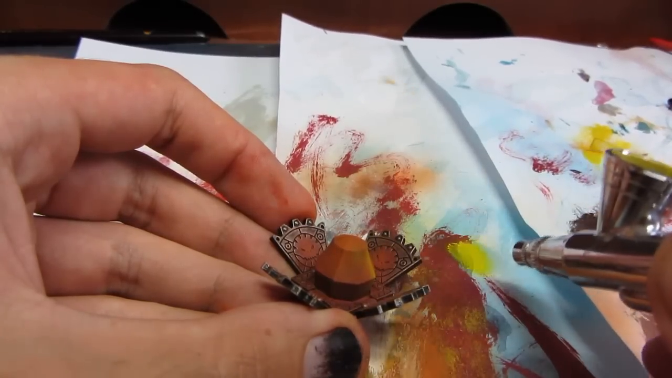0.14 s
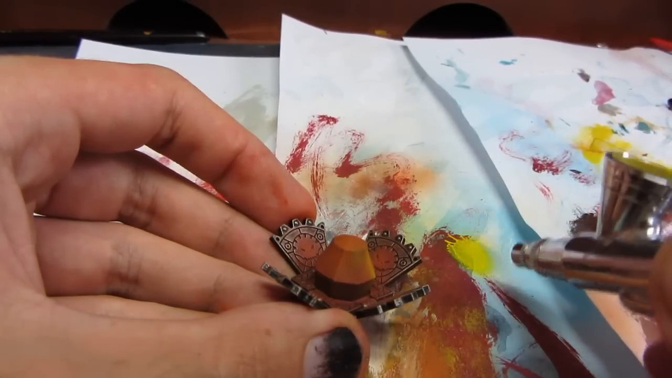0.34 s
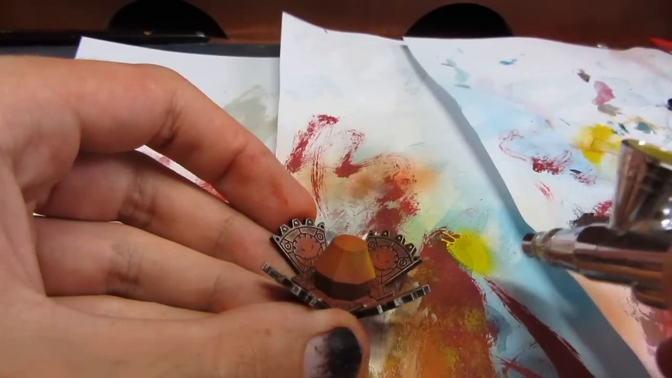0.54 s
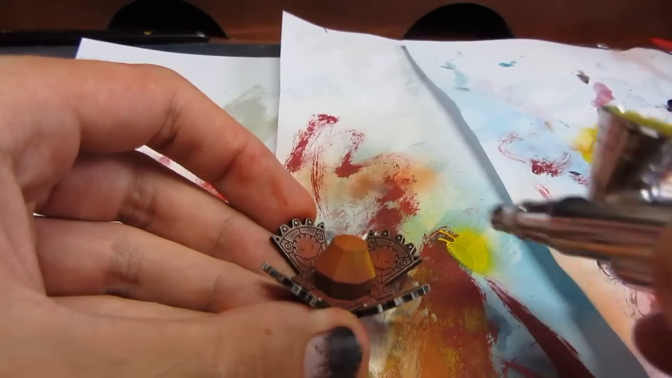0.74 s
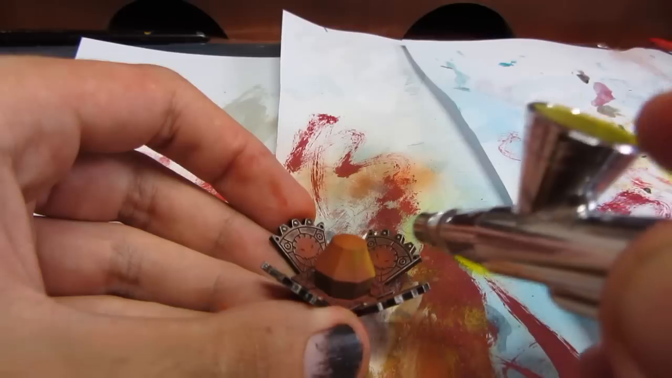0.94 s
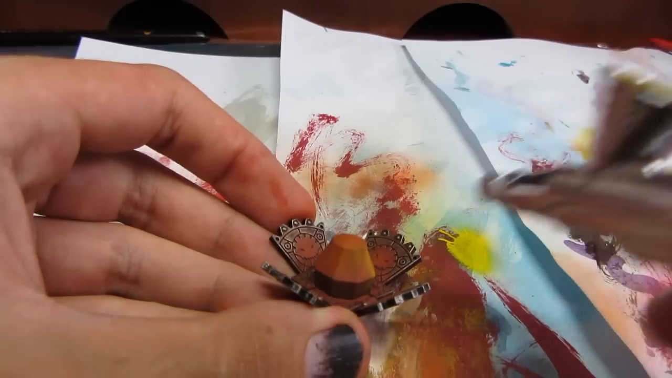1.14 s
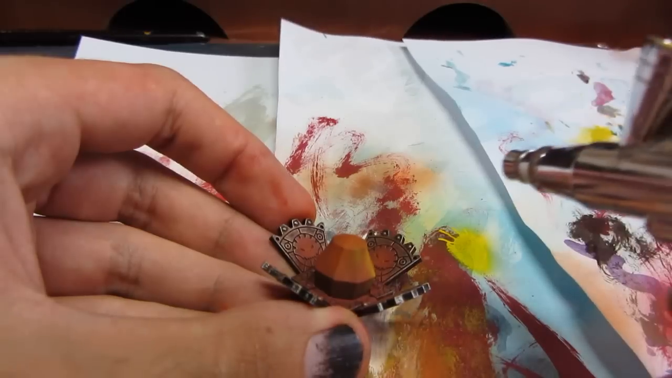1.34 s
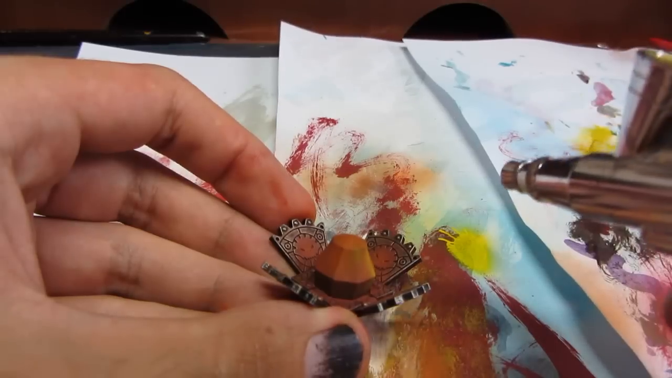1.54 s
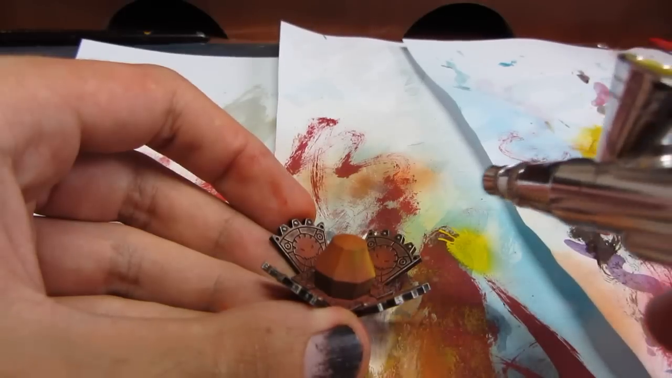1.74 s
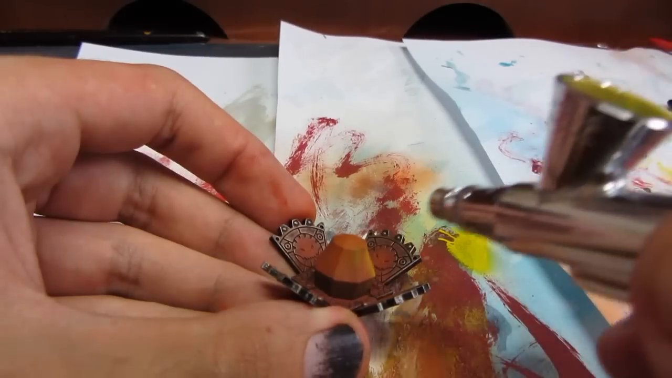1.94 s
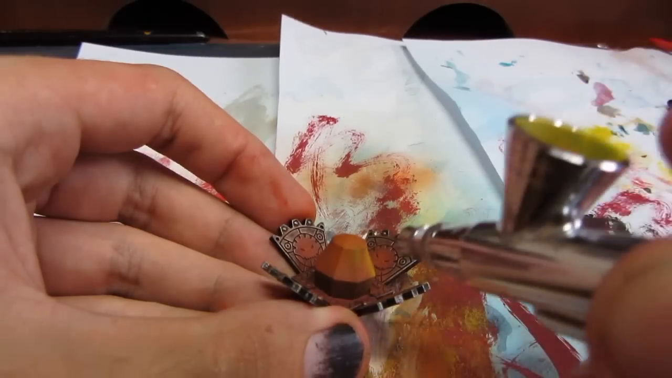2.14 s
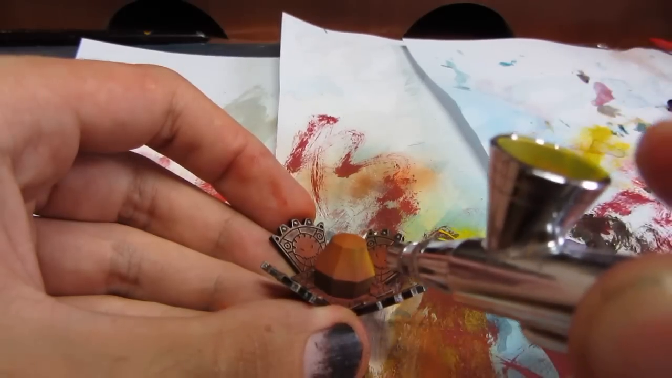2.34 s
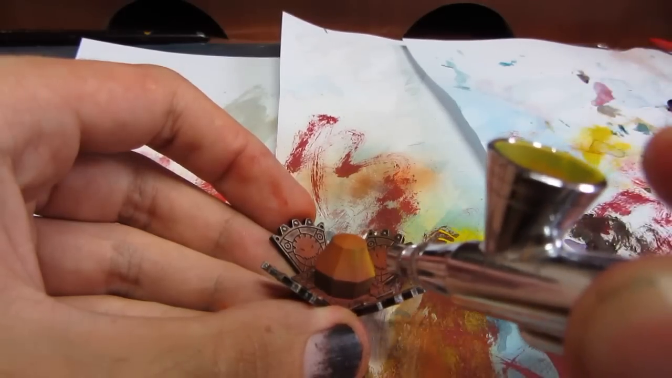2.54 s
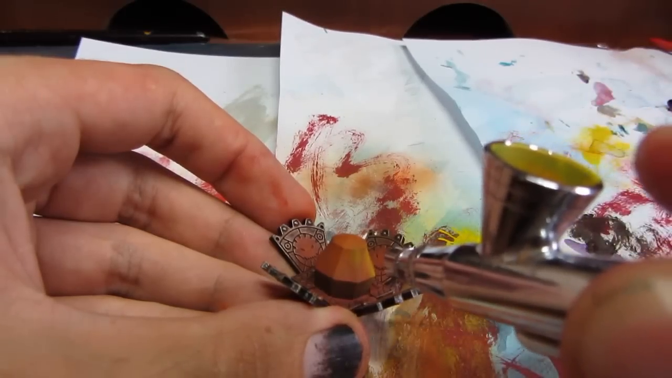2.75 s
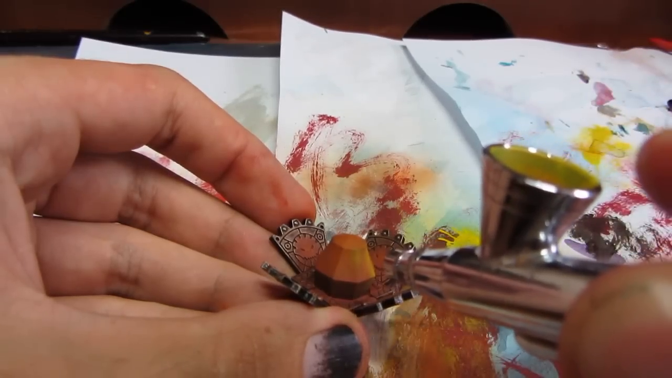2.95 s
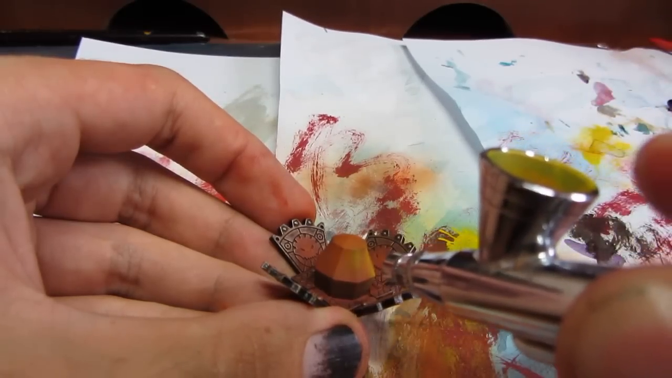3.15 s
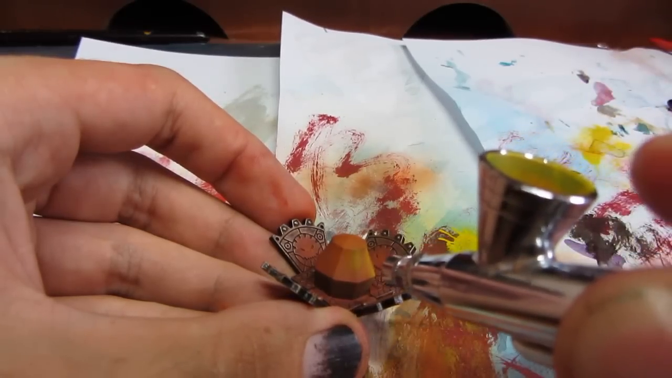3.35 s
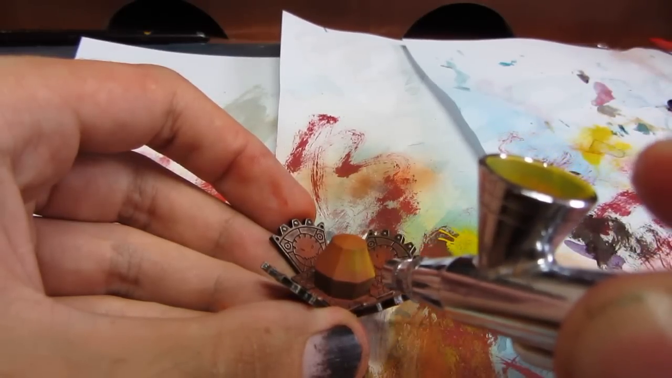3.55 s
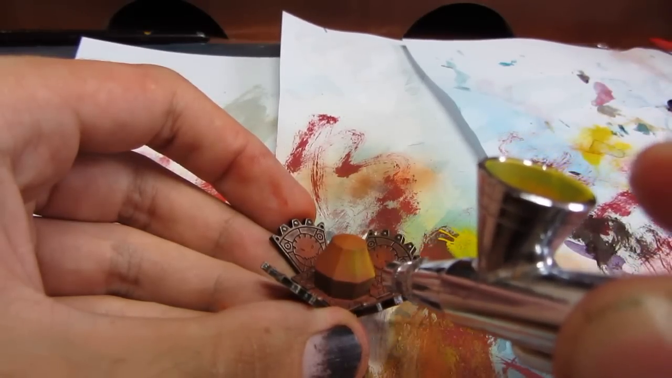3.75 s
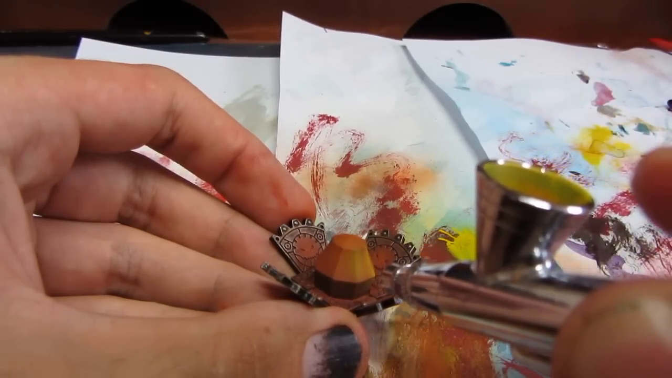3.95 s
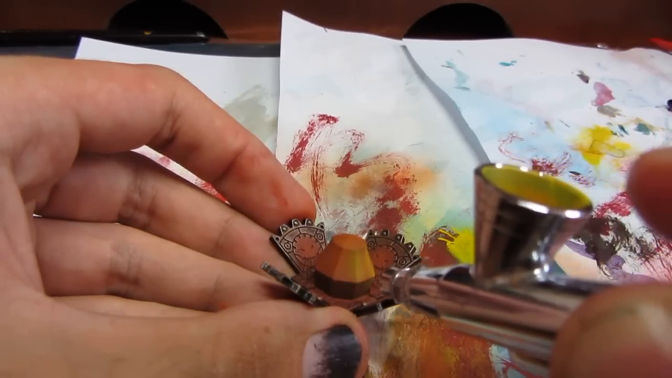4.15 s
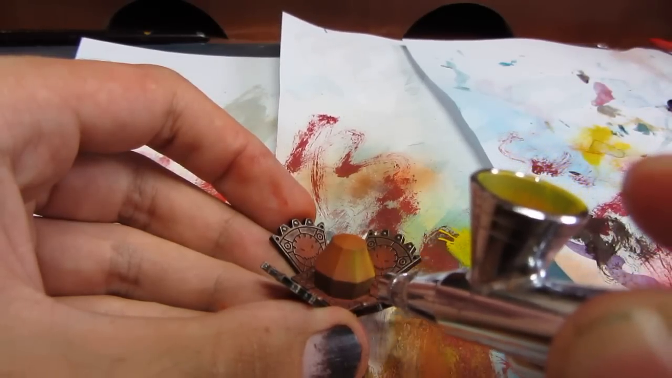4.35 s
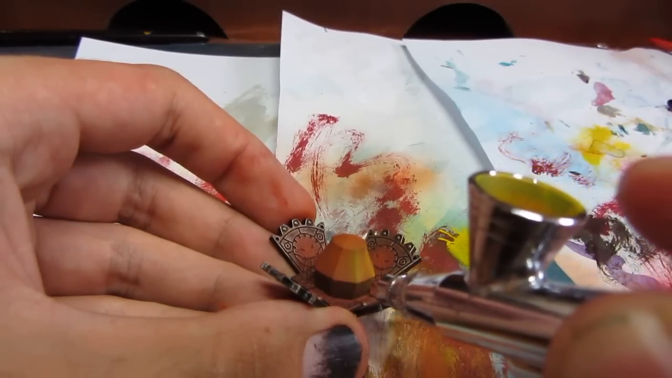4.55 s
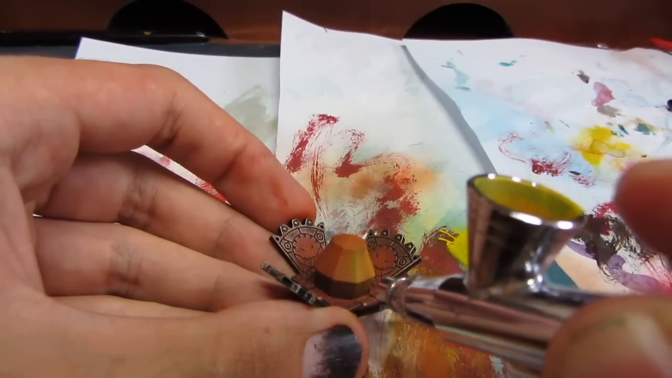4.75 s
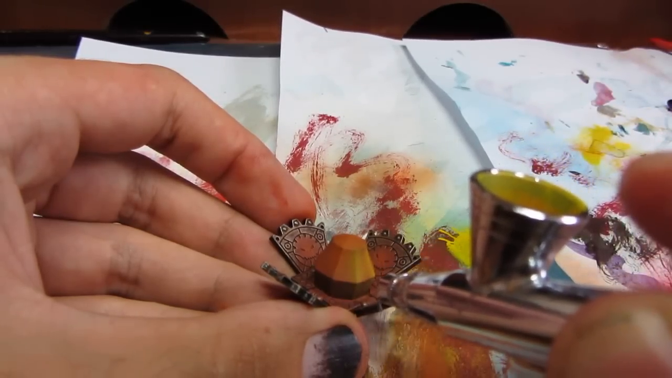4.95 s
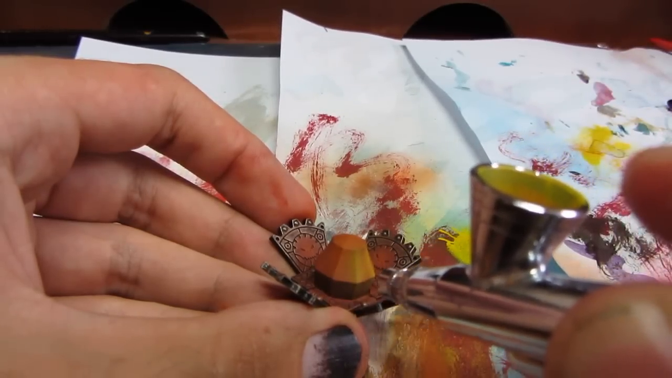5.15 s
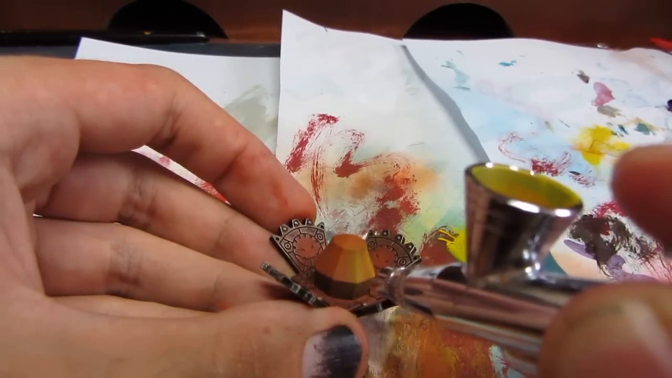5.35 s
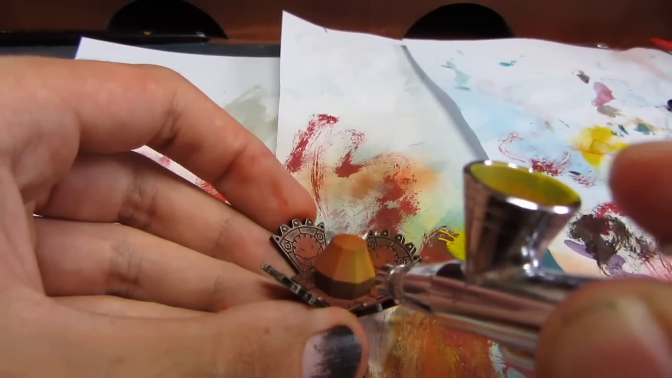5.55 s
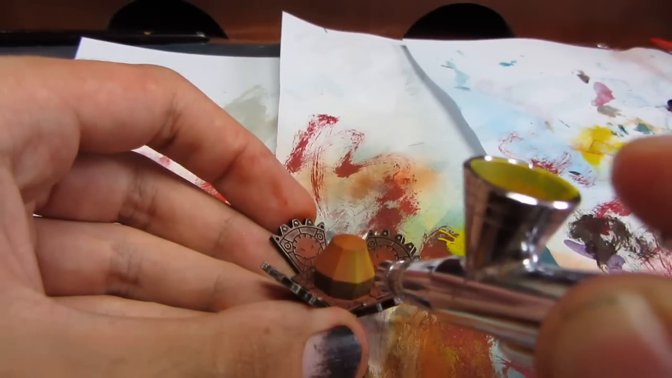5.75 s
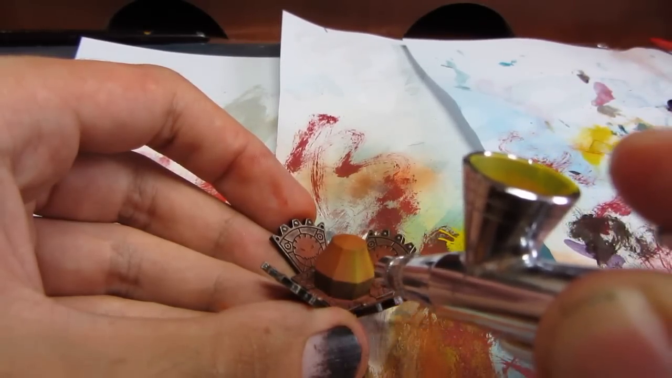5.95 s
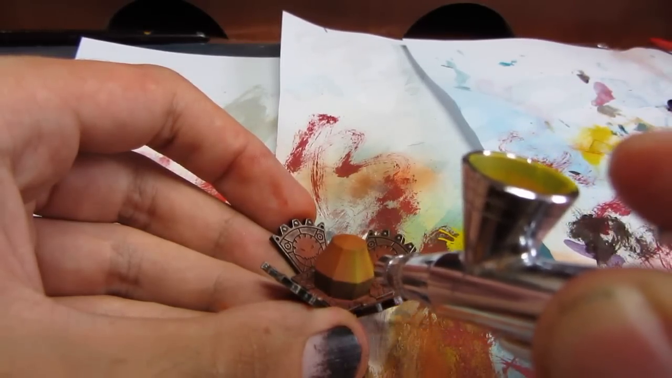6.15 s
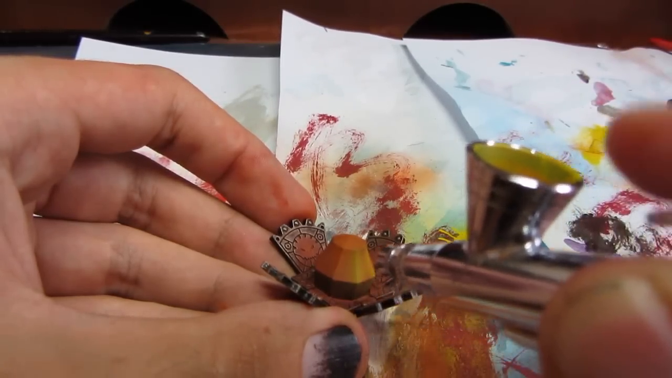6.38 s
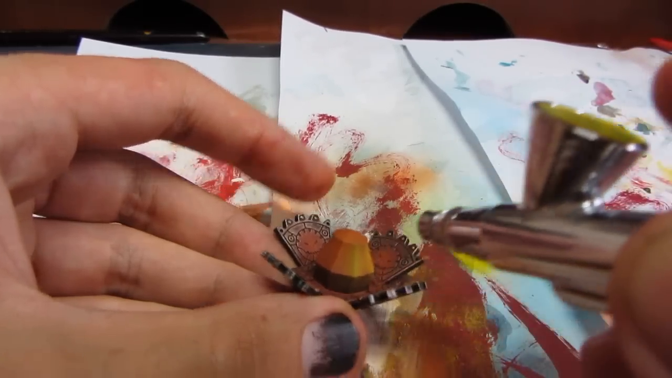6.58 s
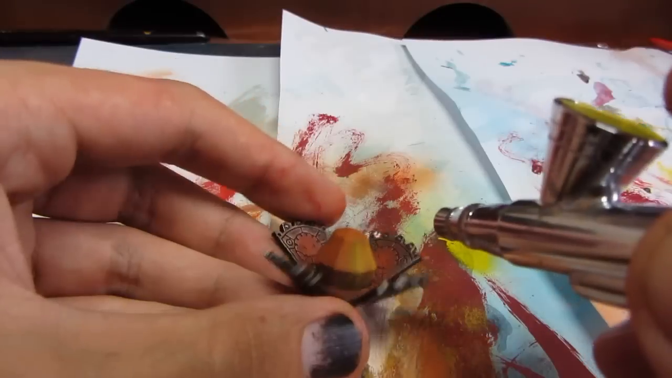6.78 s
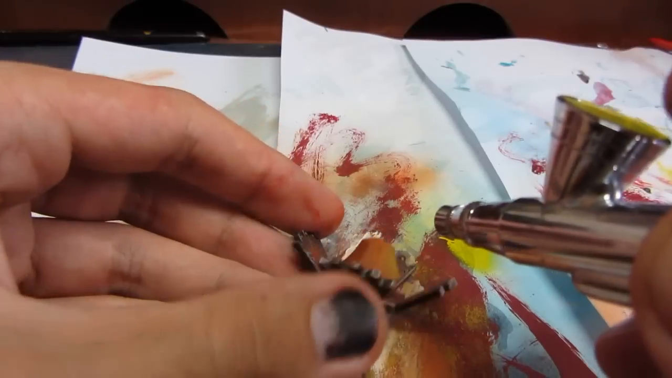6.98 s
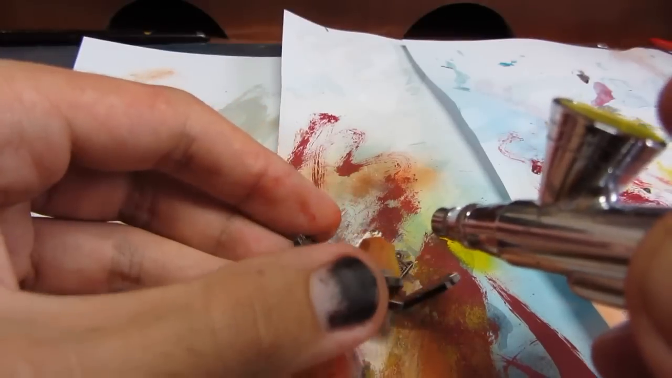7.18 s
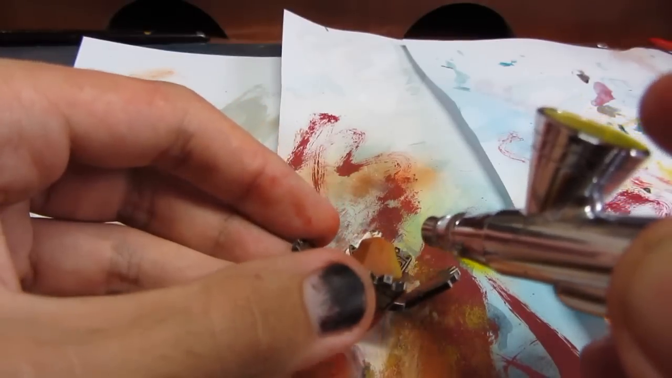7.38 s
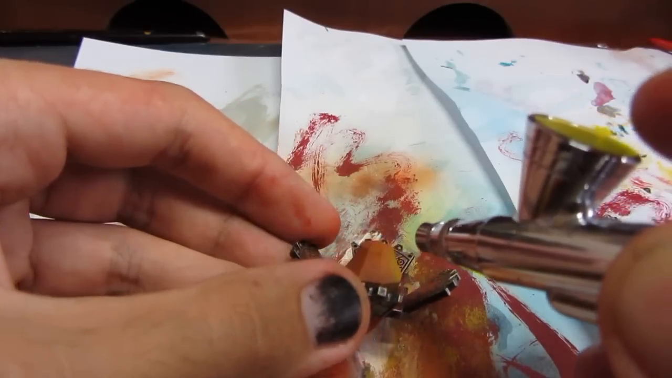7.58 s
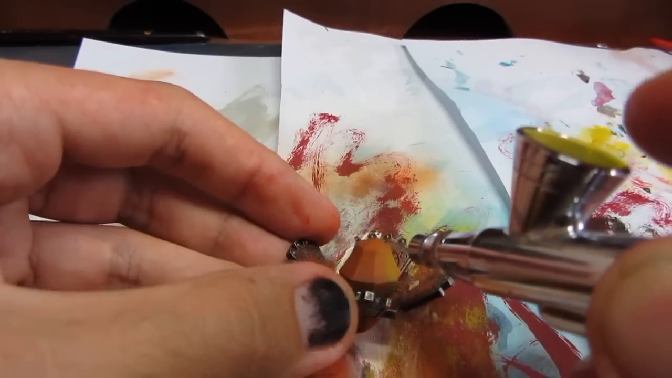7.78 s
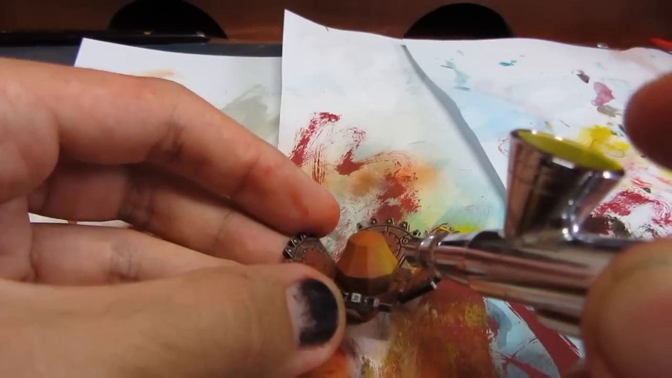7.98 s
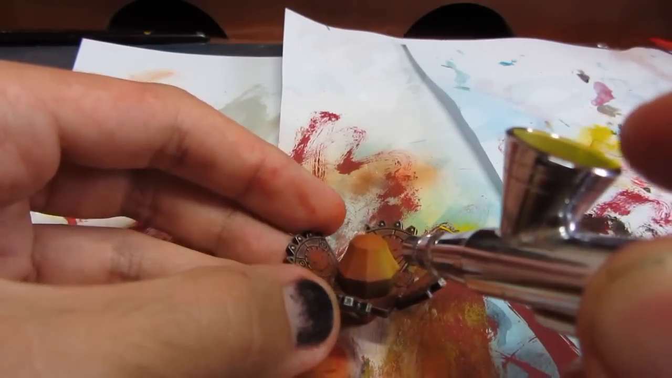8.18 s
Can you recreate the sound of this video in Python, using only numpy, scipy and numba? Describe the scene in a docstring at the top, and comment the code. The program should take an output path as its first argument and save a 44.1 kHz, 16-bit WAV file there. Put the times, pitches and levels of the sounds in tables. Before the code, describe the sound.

Close bright air hiss puffs, clicks off, then rushes in a long spray that swells near metal and stops, leaving low compressor throb and finger ticks.

```python
"""Airbrush hiss at a hobby bench, close to two microphones: short puffs on paper, a pause, then a long burst
closing in on a small metal trinket. Shaped noise makes the jet, its roar and its splash; ripples colour each side.
In the pauses a compressor throbs as low noise, noise cracks make the trigger and the fingers ticking the trinket,
grainy noise makes the rubs of skin, and the valve starts to whistle: a breathy sine in resonant air noise.
A short room tail follows the near sounds, and the whole level dips three times."""
import sys
import numpy as np
from scipy import signal
from scipy.fft import rfft, irfft
from scipy.io import wavfile
from scipy.ndimage import uniform_filter1d
from numba import njit

SR = 44100
rng = np.random.default_rng(int(sys.argv[2]) if len(sys.argv) > 2 else 0)


def bounce(signal):
    """Save signal as a 16-bit WAV file at the path given by the first command-line argument."""
    frames = np.transpose(np.atleast_2d(signal))
    limited = np.clip(frames, -1, 1)
    pcm = np.round(limited * 32767).astype(np.int16)
    wavfile.write(sys.argv[1], SR, pcm)


N = 362502
T = np.arange(N) / SR  # time in s
HZ = np.fft.rfftfreq(N, 1 / SR) + 1e-3  # spectrum bins, kept above 0 for the logarithm

# the trigger holds the air valve open, the last press for the long burst: opens_s, shuts_s
VALVE_PRESSES = [(-.05, 0.489), (.529, 0.71), (1.299, 6.46)]
# jet on the trinket, before valve and swells: time_s, edge_hiss_db, body_of_splash_relative_to_edge_db
SPLASH_LEVELS = [(1.25, -33.5, -7), (2.0, -30, -25), (2.105, -29, -2), (2.16, -25, 3), (2.33, -19, -2),
                 (2.7, -17.5, -1.5), (3.0, -18.5, -4.5), (3.7, -17.5, -6.5), (4.85, -19.5, -3.5),
                 (5.7, -18, -7.5), (6.2, -18.5, -9), (6.6, -20, -4)]
# echoes off bench, hands and trinket, nozzle near the work: centre_hz, width_hz, left_db, right_db
NEAR_ECHOES = [(780, 200, 2, 3), (1110, 170, -3, -7), (1290, 150, -1.5, 1), (1600, 200, 2, 1),
               (1890, 170, -6, -5), (2150, 400, -2, 1.5), (2930, 250, 2, 3), (3270, 250, 3.5, -1),
               (3620, 400, -2, -5.5), (4310, 200, 2, 3), (4740, 700, -1, 3.5), (5010, 200, 2.5, 0),
               (5510, 300, -3.5, .5), (5940, 400, 1, -3.5), (6800, 400, 4, 2), (7550, 300, -2, 0),
               (8440, 400, .5, -3.5), (8700, 300, 2.5, 0), (9650, 2000, 1.5, -3), (11110, 400, 3, 1.5),
               (13180, 400, -.5, 3), (15160, 700, -2, 2.5)]
# how alike both sides hear the spray near the work: frequency_hz, coherence, left_lead_radians
NEAR_LIKENESS = [(199, 0.74, 0), (520, 0.98, -1), (887, 0.88, 0), (1180, .67, -1.1), (1600, 0.99, 0.62),
                 (1920, 0.13, 1.34), (2400, 1, -0.45), (3080, 0.56, 1.28), (3470, 0.16, 1), (4000, .07, 3),
                 (5050, 0.96, 0.96), (5620, 0.48, -1), (6450, .85, -0.5), (7750, 0.78, -1.3),
                 (8400, .1, -0.2), (9300, 0.73, -1), (12870, .7, -0.5), (15590, 0.5, 0.5)]


def burst():
    """The nozzle nears the trinket: the free jet gives way to nozzle hiss and splash, with a roar in between."""
    # approach: starts_s, ends_s
    approach = (1.87, 2.395)
    angle = np.interp(T, approach, [0, np.pi / 2])  # equal-power crossfade
    edge_db, body_db = play(SPLASH_LEVELS)
    far = undb(edge_db) * free_jet()
    near = nozzle_hiss() + undb(edge_db) * splash(body_db)
    jet = np.cos(angle) * far + np.sin(angle) * near
    jet = jet * undb(valve(VALVE_PRESSES[-1:]) + pull())
    return jet + roar()


def free_jet():
    """Turbulent air with the nozzle held back from the work: broad noise with a slight flutter."""
    # colour of the free jet: frequency_hz, density_db_per_hz
    tone = [(180, -33), (300, -8), (1050, -11), (2250, -7), (2890, -6), (3300, -6), (6390, 0),
            (11000, -1.5), (12500, -5), (14300, 0), (15600, -2)]
    # echoes with the nozzle held back: centre_hz, width_hz, left_db, right_db
    echoes = [(1210, 250, -4.0, -1.0), (1720, 150, 2.0, 3.5), (2150, 250, -3.0, -0.5),
              (2840, 250, 2.0, 6.0), (4480, 250, -2.5, 1.0), (5170, 250, 2.0, -1.0), (6290, 150, 1.0, 3.0),
              (7840, 700, 2.5, -1.0), (9730, 1200, -0.5, 1.5), (12400, 300, -3.0, -2.0),
              (15590, 700, 3.0, -2.0)]
    # likeness of both sides: frequency_hz, coherence, left_lead_radians
    likeness = [(520, 0.4, 0.3), (3800, 0.97, 0.6), (4310, 0.14, 1.5), (4840, 1, -8), (5340, 0.27, 6.5),
                (5770, 0.31, -2), (7240, 0.37, 0.5), (9750, 0.59, -2.5), (15500, 0.32, -2)]
    return undb(walk(39.4)) * part(hiss(tone, likeness, echoes), 4600, 11000)


def nozzle_hiss():
    """Air hisses out of the nozzle: bright noise with a fast and a slow flutter."""
    # nozzle in the long burst, before flutter, valve and swells: time_s, level_db
    levels = [(2.0, -29.5), (2.3, -34), (2.75, -27.5), (2.95, -31.5), (3.2, -30.5), (3.7, -32),
              (4.85, -28.5), (5.3, -31), (5.55, -34), (5.75, -30.5), (6.0, -33.5), (6.6, -30.5)]
    # colour of the nozzle: frequency_hz, density_db_per_hz
    tone = [(1000, -29.5), (4000, -10.5), (10000, -0.5), (12300, -5), (13800, 1.5), (16000, -2)]
    flutter_db = 0.58 * walk(40) + 0.8 * walk(7.8)
    return undb(play(levels)[0] + flutter_db) * part(hiss(tone, NEAR_LIKENESS, NEAR_ECHOES), 12500, 15200)


def splash(body_db):
    """The jet strikes the trinket: a treble edge and a lower body of one noise, each with its own flutter."""
    # colour of the splash: frequency_hz, density_db_per_hz
    tone = [(150, -27.5), (500, -19.5), (1500, -9.5), (2600, -4), (5000, -2), (7000, -0.5), (10000, -5),
            (12000, -19), (16000, -30)]
    noise = hiss(tone, NEAR_LIKENESS, NEAR_ECHOES)
    high = 1 / (1 + (3800 / HZ) ** 10)  # crossover at 3800 Hz
    edge = undb(0.79 * walk(50)) * part(noise, 4200, 10500, high)
    body = undb(body_db + walk(30)) * part(noise, 1200, 3600, 1 - high)
    return edge + body


def roar():
    """Wide eddies of the far jet sweep over the work and shrink as it nears: band-passed noise climbs in pitch."""
    # the passing roar, before its gusts: time_s, level_db, centre_hz
    passing = [(1.95, -52, 450), (2.02, -31.5, 544), (2.09, -27, 750), (2.2, -20, 1250),
               (2.33, -28.5, 2000), (2.45, -38, 2300)]
    tone = [(20, 2.0), (800, -1.5), (1120, -1), (1550, 2), (2300, -3), (20000, -5.0)]  # frequency_hz, db
    roar_db, hz = play(passing)
    noise = part(hiss(tone, NEAR_LIKENESS, NEAR_ECHOES), 20, 20000)
    width = 2.3 * hz
    eddies = np.array([svf(svf(side, hz, width), hz, width) for side in noise])
    eddies = eddies * np.sqrt(SR / hz / 4)  # about constant power whatever their size
    gusts_db = 2.3 * walk(90)
    return undb(roar_db + gusts_db) * eddies


def puffs():
    """The jet beats on paper; the nozzle's own treble swells more with each pull."""
    # air on paper, before valve and swells: time_s, level_db
    paper = [(0, -33.5), (.12, -29.5), (.8, -31.5)]
    # colour of the puffs: frequency_hz, density_db_per_hz
    tone = [(88, -39), (150, -18), (346, -17), (767, -8), (1110, -9), (2320, -3), (4160, -4), (6760, 1.5),
            (10400, -3), (13900, -2), (15600, -2.5)]
    # echoes with the nozzle off to the right: centre_hz, width_hz, left_db, right_db
    echoes = [(780, 150, 2.5, 3.5), (1460, 2000, -1.5, 2.0), (2330, 250, 3.0, 3.0), (3270, 400, 0.0, 3.5),
              (3960, 400, -2.5, -2.0), (5940, 250, -4.5, -2.0), (6890, 150, -3.0, 2.0),
              (7410, 1200, -4.5, -2.5), (11800, 250, -4.0, 3.0), (12580, 150, 2.0, 4.5),
              (14810, 2000, -1.0, 6.5), (14900, 250, 4.0, -3.5)]
    # likeness of both sides: frequency_hz, coherence, left_lead_radians
    likeness = [(516, 0.5, -0.7), (2330, 0.91, 0.9), (3220, 0.64, -1.5), (4820, 0.93, 1.7), (5570, 0.5, -2),
                (6750, 0.27, 0.3), (9500, 0.54, 3.5), (12580, 0.63, 1.5), (15590, 0.65, 1)]
    swell_db = pull()
    db = play(paper)[0] + valve(VALVE_PRESSES[:-1]) + swell_db
    treble_db = -7 + 0.6 * swell_db  # on top of the swell that all of it shares
    noise = hiss(tone, likeness, echoes)
    high = 1 / (1 + (11500 / HZ) ** 10)  # crossover at 11500 Hz
    on_paper = part(noise, 1500, 10800, 1 - high)
    at_nozzle = undb(treble_db) * part(noise, 12700, 15600, high)
    flutter = undb(walk(60))
    return undb(db) * flutter * (on_paper + at_nozzle)


def valve(presses):
    """Level in dB of the air: it jumps up on a press and dies fast on release."""
    open_db_per_s, shut_db_per_s = 2500, 1500
    gates = []
    for opens, shuts in presses:
        slope = np.minimum((T - opens) * open_db_per_s, (shuts - T) * shut_db_per_s)
        gates.append(np.minimum(0, slope))
    return np.max(gates, axis=0)


def pull():
    """Swell in dB of the jet as the needle is pulled back: quick rise, hold, slower fall."""
    # pulls of the needle: start_s, hold_s, rise_db
    pulls = [(.133, 0.071, 5), (.331, 0.1, 5.5), (0.582, 0.09, 5.5), (1.616, 0.032, 2), (1.72, .04, 1.5)]
    attack_s, release_s = 0.0084, 0.023
    swell_db = np.zeros(N)
    for start, hold, rise_db in pulls:
        corners = np.cumsum([start, attack_s, hold, release_s])
        swell_db += np.interp(T, corners, [0, rise_db, rise_db, 0])
    return swell_db


def handling():
    """Trigger and valve clicks, fingers and nails ticking the trinket, and five faint ticks at random."""
    # trigger and valve clicks: start_s, peak_db, centre_hz, width_octaves, left_minus_right_db
    trigger = [(.134, -16, 3000, 3, 0), (.4825, -19, 7800, 0.81, -5), (0.53, -17.5, 4000, 5.4, -7),
               (.7238, -23, 8500, 0.78, -6), (.7711, -36, 9000, 2.3, -4), (.9562, -50, 6000, 3, -2),
               (1.2164, -49, 9000, 2.5, -2), (1.303, -22, 8500, 1, -4)]
    # fingers and nails on the trinket: start_s, peak_db, centre_hz, width_octaves, t60_s
    ticks = [(6.5974, -48, 10000, 1.3, .012), (6.9187, -50, 6000, 1.3, .012),
             (7.0424, -32.5, 1700, 3.1, .018), (7.0608, -30, 1700, 3.8, 0.015),
             (7.1784, -50, 3000, 1.4, .015), (7.3322, -44, 2100, .6, .025), (7.3721, -49, 2130, .4, .035),
             (7.4759, -40.5, 2500, .8, .015), (7.4814, -48, 3500, 1.2, .018),
             (7.566, -34.5, 6300, 1.1, 0.02), (7.8216, -39, 2000, 0.81, .034),
             (7.8441, -45, 10000, 1.3, .022), (7.9006, -36, 2200, 2.3, .03), (7.9234, -50, 6500, 1.2, .014)]
    t60 = 0.017  # s, of trigger and faint ticks
    faint = [(s, -55, 9000, 2, t60) for s in rng.uniform(6.7, 8.2, size=5)]
    trigger = [(s, db, hz, octaves, t60, pan_db) for s, db, hz, octaves, pan_db in trigger]
    return clicks(trigger + [(*tick, 0) for tick in ticks + faint])


def clicks(events):
    """A dry crack of dying noise; rows: start_s, peak_db, centre_hz, width_octaves, t60_s, left_minus_right_db."""
    length = 8192  # samples
    out, t = np.zeros((2, N + length)), np.arange(length) / SR
    airs = rng.standard_normal((len(events), length))
    for (s, peak_db, hz, octaves, t60, pan_db), air in zip(events, airs):
        crack = coloured(air * 1000 ** (-t / t60), hz, octaves)
        crack = crack / np.abs(crack).max()
        sides = undb([peak_db + pan_db / 2, peak_db - pan_db / 2])
        i = int(s * SR)
        out[:, i:i + length] += np.outer(sides, crack)
    return out[:, :N]


def rustles():
    """Skin brushes paper and metal: brief rubs of noise whose level jumps grain by grain."""
    # rubs: start_s, length_s, level_db, centre_hz, width_octaves
    rubs = [(1.173, 0.14, -68, 12000, 2.2), (6.985, 0.053, -67, 9000, 1.8), (7.26, .022, -62, 6000, 3),
            (7.85, .03, -68, 9000, 2), (7.966, 0.013, -57, 6000, 2.8)]
    size = 8192  # samples
    out, t = np.zeros(N + size), np.arange(size) / SR
    draws = rng.standard_normal((len(rubs), 2, size))
    for (s, length, db, hz, octaves), (air, grain) in zip(rubs, draws):
        grains_db = 4 * np.repeat(grain[:64], 128)  # a new level every 128 samples
        rub = coloured(air * undb(grains_db) * (t < length), hz, octaves)
        rms = np.sqrt(np.sum(rub ** 2) / SR / length)
        i = int(s * SR)
        out[i:i + size] += undb(db) * rub / rms
    return out[:N]


def coloured(burst, centre_hz, octaves):
    """A short sound through a broad hump and the faint resonances of the metal at hand."""
    # resonances: centre_hz, width_hz, gain_db
    metal = [(1610, 330, 10.5), (2150, 140, 9), (5670, 400, 6), (6670, 380, 7.5), (9300, 500, 3.5)]
    hz = np.fft.rfftfreq(len(burst), 1 / SR)[1:]
    hump_db = -12 * (np.log2(hz / centre_hz) / octaves) ** 2
    ring_db = sum(g_db / (1 + (2 * (hz - f) / w) ** 2) for f, w, g_db in metal)
    db = hump_db + ring_db - 14 * (hz / 13000) ** 3  # the treble rolls off softly toward the top
    # minimum phase keeps the attack sharp
    log_gain = np.log(undb(np.maximum(np.r_[db[0], db], -45)))
    cepstrum = irfft(log_gain)
    cepstrum[1:len(burst) // 2] *= 2
    cepstrum[len(burst) // 2 + 1:] = 0
    return irfft(rfft(burst) * np.exp(rfft(cepstrum)))


def leak():
    """Air leaks past the barely pressed valve: thin noise in fixed resonances and a sinking, breathy whistle."""
    # the leak as a whole: time_s, level_db, whistle_hz
    course = [(8.074, -80, 4080), (8.082, -49, 4060), (8.12, -48, 3990), (8.22, -51, 3680)]
    # fixed resonances of the valve: centre_hz, width_hz, level_db
    modes = [(2220, 250, -11.5), (4350, 400, -11.5), (5220, 900, -23), (6720, 500, -22), (7280, 180, -17.5),
             (7830, 300, -21)]
    db, hz = play(course)
    air, one = rng.standard_normal(N), np.ones(N)
    bands = [(f * one, w, g_db) for f, w, g_db in modes]
    bands.append((hz, 300, -5.5))  # breath around the whistle, 300 Hz wide
    breath = np.zeros(N)
    for f, w, g_db in bands:
        band = svf(svf(air, f, w * one), f, w * one)
        breath += undb(g_db) * np.sqrt(SR / w) * band  # narrow bands are raised to even out their power
    wavering_hz = hz * (1 + 0.01 * walk(200))
    whistle = undb(-3.5 + 1.2 * walk(60)) * np.sin(2 * np.pi * np.cumsum(wavering_hz) / SR)
    return undb(db) * (breath + whistle) * undb([[-.5], [.5]])  # right side 1 dB louder


def rumble():
    """Room noise behind the bench; its bass throbs with the compressor's strokes and wanders in level."""
    # rumble of the room, before throb and wander: time_s, level_db
    levels = [(0, -55.5), (1.15, -55), (2.15, -48.5), (2.45, -56.5), (3.7, -58), (5.5, -59), (6.3, -57),
              (7.0, -57.5), (8.22, -52)]
    # colour of the rumble: frequency_hz, density_db_per_hz
    tone = [(13, -36.5), (30, -15), (62, -3), (85, -8.5), (125, -1), (190, 0.5), (400, -4.5), (680, -7),
            (1050, -12.5), (2200, -20.5), (3730, -33), (6750, -33.5), (10000, -43), (12500, -56)]
    # likeness of both sides: frequency_hz, coherence, left_lead_radians
    likeness = [(25, .7, 0.0046), (59.8, 0.11, 0.0017), (500, 0.35, 0), (2000, 0.29, 0.0035),
                (10000, .1, 0)]
    # narrow hums: centre_hz, width_hz, left_db, right_db
    hums = [(116, 16, 4, 4), (176, 14, 4, 4), (675, 20, 3, 3), (1134, 10, 9, 9)]
    piston_hz, throb = 24, 0.16  # mean stroke rate, depth as a fraction of the level
    noise = hiss(tone, likeness, hums)
    low = 1 / (1 + (HZ / 500) ** 2)
    stroke_hz = piston_hz * (1 + 0.06 * walk(4))
    stroke = 1 + throb * np.sin(2 * np.pi * np.cumsum(stroke_hz) / SR)
    bass = stroke * undb(2.0 * walk(7.3)) * part(noise, 50, 133.0, low)
    upper = undb(walk(7.3)) * part(noise, 50, 140, 1 - low)
    return undb(play(levels)[0]) * (bass + upper)


def room(x):
    """A short fading tail, unrelated on the two sides and duller than the direct sound."""
    t60, dull_hz = 0.41, 7000
    t = np.arange(SR // 2) / SR
    tail = rng.standard_normal((2, len(t))) * 1000 ** (-t / t60)
    tail = tail * (t > .004)  # a 4 ms gap after the direct sound
    tail = tail / np.sqrt(np.sum(tail ** 2) / 2)
    tail = signal.lfilter(*signal.butter(1, dull_hz, fs=SR), tail)
    return undb(-17.5) * signal.fftconvolve(x, tail, axes=1)[:, :N]


def undb(db):
    """Amplitude factor of a level in dB."""
    return 10 ** (np.asarray(db) / 20)


def play(table, off_db=-120):
    """Columns over time; the first, a level, is silent outside the table."""
    s, db, *rest = np.vstack(table).T
    level = np.interp(T, s, db, off_db, off_db)
    return [level] + [np.interp(T, s, column) for column in rest]


def shape(points):
    """Straight lines on a log-frequency axis."""
    hz, *values = np.transpose(points)
    return [np.interp(np.log(HZ), np.log(hz), v) for v in values]


def hiss(tone, likeness, ripples=()):
    """Spectrum of a two-sided noise with given colour, likeness and ripples of each side."""
    left, own = rfft(rng.standard_normal((2, N)))
    coherence, lead = shape(likeness)
    coherence = np.clip(coherence, 0, 1)
    db = shape(tone)[0] + np.zeros((2, 1))
    for hz, width, *sides_db in ripples:
        db = db + np.outer(sides_db, np.exp(-2 * ((HZ - hz) / width) ** 2))
    right = coherence * np.exp(-1j * lead) * left + np.sqrt(1 - coherence ** 2) * own
    return undb(db) * np.array([left, right])


def part(spectrum, lo_hz, hi_hz, share=1):
    """A share of the noise, scaled so that the band lo-hi of the whole noise's middle has rms 1."""
    middle = spectrum.mean(axis=0)[(HZ > lo_hz) & (HZ < hi_hz)]
    power = np.sum(np.abs(middle) ** 2) * 2 / N ** 2
    return irfft(spectrum * share, N) / np.sqrt(power)


def walk(rate):
    """Random levels held 1 / rate s and slewed twice; spread near 0.74."""
    k = int(SR / rate)
    held = np.repeat(rng.standard_normal(N // k + 1), k)
    return uniform_filter1d(uniform_filter1d(held, k), k)[:N]


@njit
def svf(x, hz, width):
    """State-variable band-pass with moving centre and width, gain 1 at the centre."""
    y, b, l = np.empty(len(x)), 0., 0.
    for i in range(len(x)):
        g, k = np.tan(np.pi * hz[i] / SR), width[i] / hz[i]
        v = (b + g * (x[i] - l)) / (1 + g * (g + k))
        b, l, y[i] = 2 * v - b, l + 2 * g * v, k * v
    return y


def scene():
    """All near sources with their room tail, over the rumble; everything shares the dips in level."""
    # the whole level drops at once and creeps back: start_s, drop_db
    drops = [(2.34, 3), (3.742, 3.5), (6.24, 2.5)]
    creep_s = 0.99  # time constant of the return
    near = burst() + puffs() + handling() + rustles() + leak()
    drop_db = sum(db * (T > s) * np.exp(-np.abs(T - s) / creep_s) for s, db in drops)
    return (near + room(near) + rumble()) * undb(-drop_db)


def record(dry):
    """The recorder cuts the top steeply above 15710 Hz."""
    return signal.sosfilt(signal.ellip(14, .2, 80, 15710, fs=SR, output="sos"), dry)


dry = scene()
out = record(dry)
bounce(out)
```